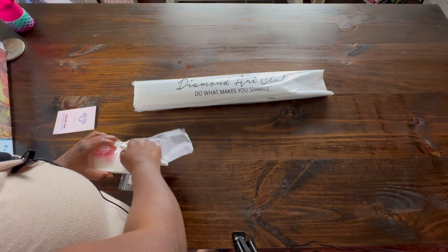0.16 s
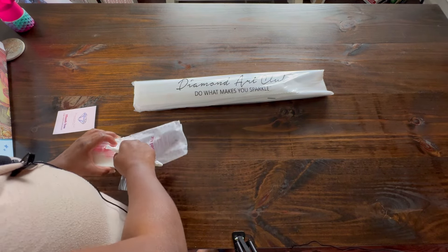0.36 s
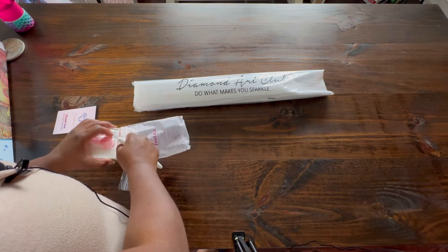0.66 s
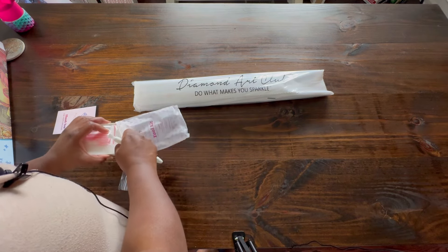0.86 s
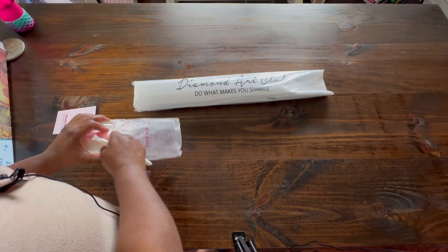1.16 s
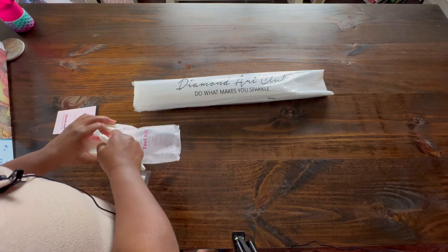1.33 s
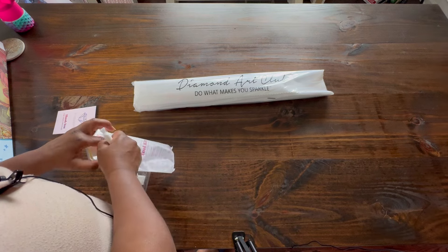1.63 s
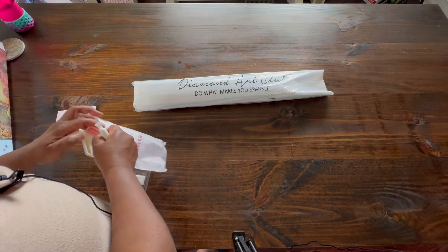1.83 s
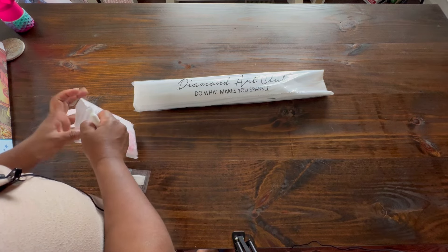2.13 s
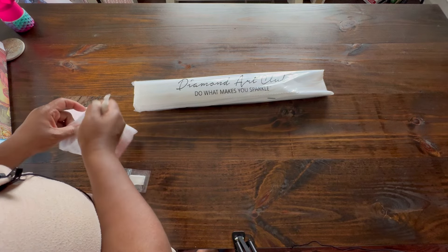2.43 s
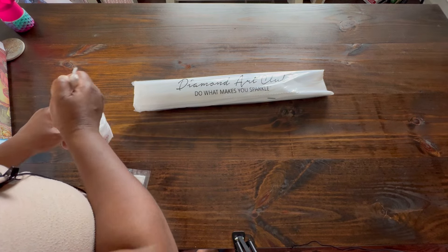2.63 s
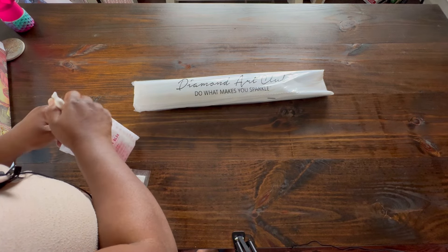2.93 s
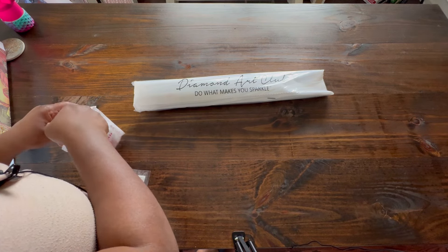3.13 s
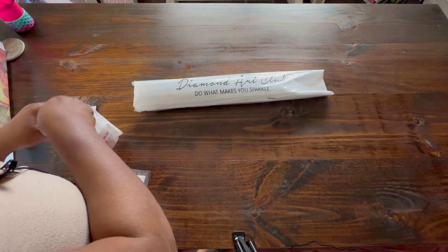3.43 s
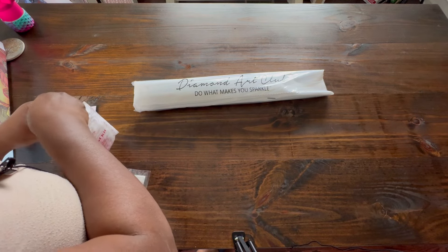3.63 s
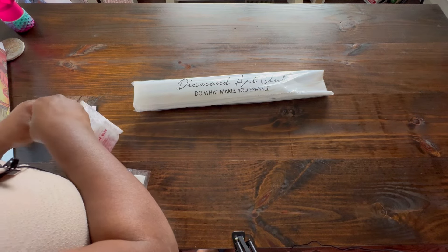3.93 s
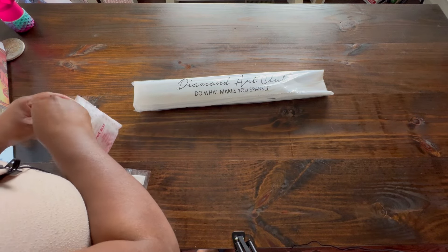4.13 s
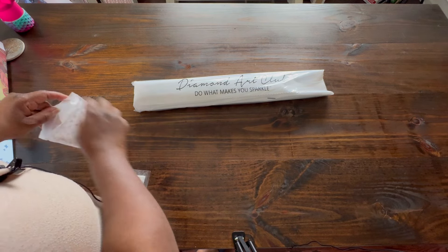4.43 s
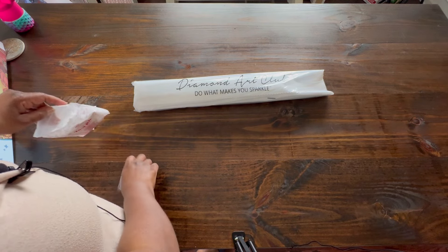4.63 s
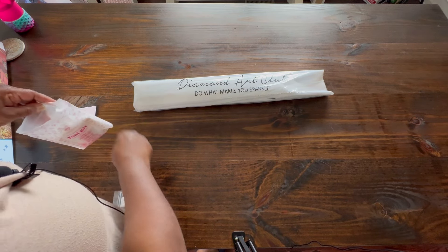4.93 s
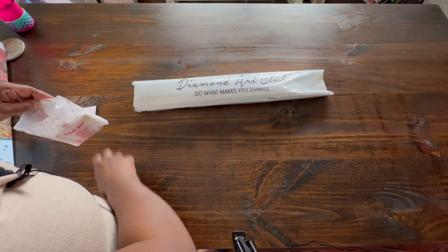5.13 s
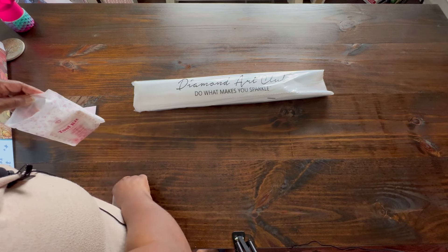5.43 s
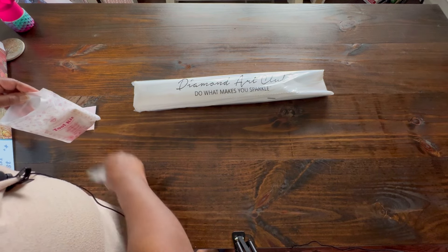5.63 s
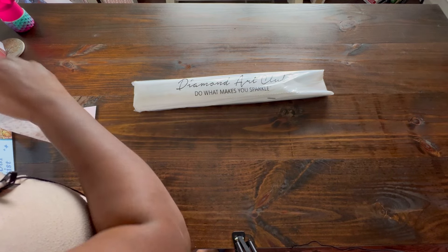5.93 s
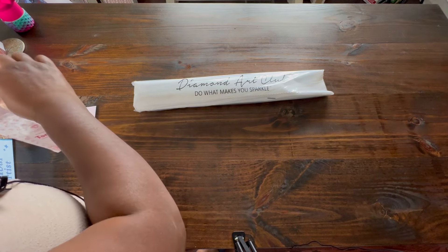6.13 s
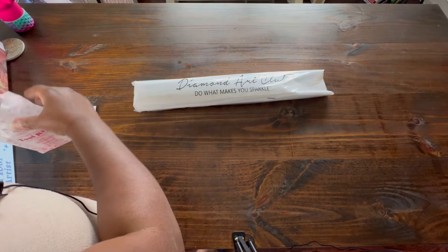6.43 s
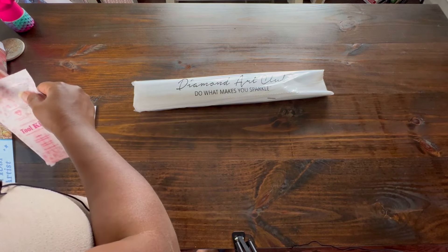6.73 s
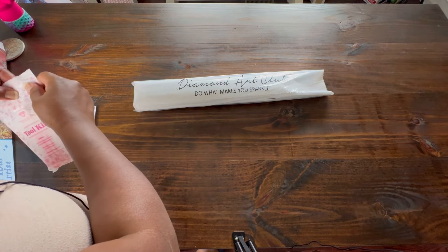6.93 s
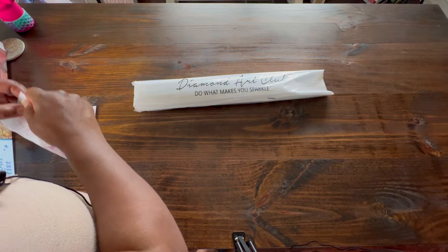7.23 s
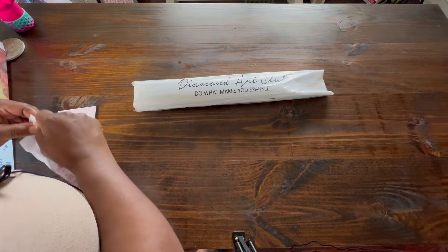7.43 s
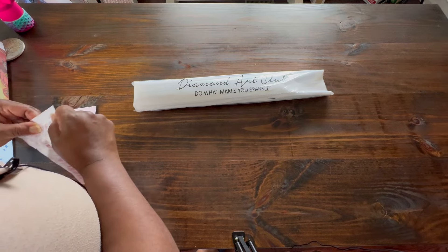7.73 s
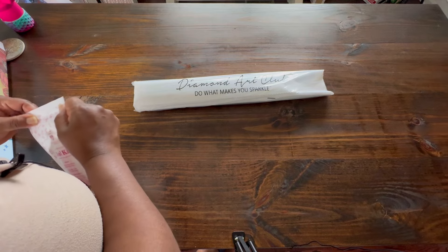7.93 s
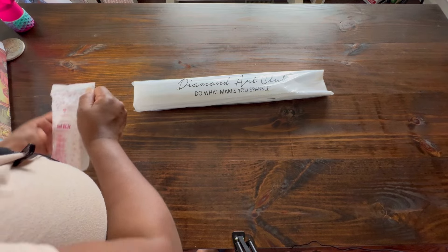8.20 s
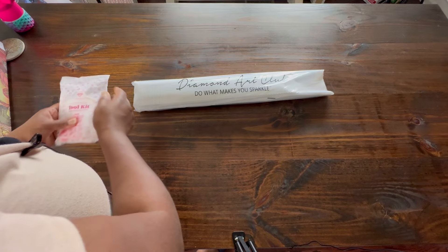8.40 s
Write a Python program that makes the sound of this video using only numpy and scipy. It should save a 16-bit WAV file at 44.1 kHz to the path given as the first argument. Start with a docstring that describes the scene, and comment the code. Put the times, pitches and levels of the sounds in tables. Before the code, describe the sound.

Two hands work a small stiff plastic packet over a wooden table. Dense crackles and snaps come first, swelling to a loud hollow crumple near two seconds, then sparse bursts, a very sharp snap with table knocks before five seconds, and lighter rustling to the end. Stereo microphones, brighter on the left, catch a lively quiet room with faint air noise and hum.

```python
"""A small stiff plastic packet crackles and snaps as two hands work it open over a wooden table.
Each grip swells and lets go: noise-like swarms of tiny creases feed filters for crackle, sizzle, finger rub
and the hollow ring of the pouch, while single buckles excite the same resonances as loud snaps.
Hands knock on the table, a sum of decaying modes; all of it echoes in a quiet, lively room.
Air noise and a low wavering hum lie underneath."""
import sys
import numpy as np
from scipy import signal
from scipy.fft import rfft, irfft, next_fast_len
from scipy.io import wavfile
from scipy.ndimage import uniform_filter1d

SR = 44100
rng = np.random.default_rng(int(sys.argv[2]) if len(sys.argv) > 2 else 0)


def unload_wav(signal):
    """Save mono or channel-first audio to the path in sys.argv[1] as 16-bit WAV at rate SR, clipped to [-1, 1]."""
    wavfile.write(
        sys.argv[1],
        SR,
        np.round(np.clip(np.atleast_2d(signal).T, -1, 1) * 32767).astype(np.int16),
    )


N = 377451
TIME = np.arange(N) / SR   # seconds

# Spectra of the creasing film and the rubbing fingers, the first two shared with the snaps.
# Each row: frequency in Hz, relative density in dB per Hz.
CRACKLE_SPECTRUM = [(900, -26.5), (1700, 9.5), (2500, 10), (3100, 6), (3800, 5), (5000, 4), (6800, 4.5),
                    (8500, -23), (12000, -29.5)]
SIZZLE_SPECTRUM = [(4500, -40.5), (7000, 4), (8200, 4), (9300, 8), (10300, 1.5), (11500, -2), (12600, -8),
                   (13600, 1), (14600, 6), (15400, -20.5), (16500, -5.5)]
RUB_SPECTRUM = [(90, -11), (180, -12), (300, 1), (450, -0.5), (800, 3), (1100, 6.5), (1500, -4.5),
                (2500, -23)]


def crinkling(typical_per_s=300, spread_db=3.5, clump_db=3.0, slide_share=0.41,
              crackle_trim_db=-1, sizzle_trim_db=-1, rub_trim_db=-1, ring_trim_db=0):
    """Crackling noise: the harder the film is worked, the more creases a second, in clumps as fingers slip."""
    crackle_db, sizzle_db, rub_db, ring_db = grip_levels()
    per_s = typical_per_s * from_db(0.6 * (crackle_db - np.median(crackle_db)))
    film = evened(creases(per_s, spread_db, facet_width_hz=600))
    film = film + slide_share * rng.standard_normal(N)   # between buckles the film slides on itself
    friction = film + 0.9 * rng.standard_normal(N)
    clumps_db = clump_db * drift(80)

    crackle = evened(coloured(film, CRACKLE_SPECTRUM))
    sizzle = evened(coloured(film, SIZZLE_SPECTRUM))
    rub = evened(coloured(friction, RUB_SPECTRUM))
    ring = evened(pouch(friction, pouch_hz(TIME)))
    return (from_db(crackle_db + clumps_db + crackle_trim_db) * crackle
            + from_db(sizzle_db + clumps_db + sizzle_trim_db) * sizzle
            + from_db(rub_db + rub_trim_db) * rub
            + from_db(ring_db + ring_trim_db) * ring)


# Each grip, pull or rub of the fingers. Each row: time of its height in seconds, swell in seconds,
# release in seconds, then crackle, sizzle, finger rub and hollow pouch ring in dB, before the trims.
GRIPS = [(0.0, .02, 0.058, -48.5, -61, -47.5, -49), (0.12, 0.11, 0.24, -47, -54, -49.5, -72),
         (0.3, .15, 0.1, -46.5, -47.5, -48, -64), (0.45, .1, 0.2, -51.5, -51.5, -57, -72),
         (0.64, 0.26, 0.075, -57.5, -61.5, -55, -70), (0.98, 0.114, 0.16, -52.5, -54, -47.5, -72),
         (1.17, 0.17, 0.11, -51, -52, -43, -67), (1.4, 0.156, 0.31, -54, -68, -48.5, -58),
         (1.54, 0.25, 0.38, -49.5, -50.5, -55, -59), (1.769, .1, 0.013, -48.5, -51.5, -59, -48.5),
         (1.951, 0.13, 0.14, -36.5, -42.5, -38, -41), (2.1, 0.1, 0.015, -41, -55, -42.5, -40),
         (2.199, 0.042, 0.094, -38, -43, -39.5, -38.5), (2.36, 0.357, .11, -46.5, -52.5, -51, -46.5),
         (2.49, 0.06, .04, -54.5, -56, -60, -43), (2.78, .15, 0.099, -57.5, -72, -58, -63),
         (2.98, 0.036, 0.29, -64.5, -66.5, -68, -85), (3.119, 0.031, 0.038, -38, -48, -41, -29.5),
         (3.53, 0.16, 0.033, -57.5, -67, -57, -60), (3.62, 0.038, 0.07, -52, -47.5, -44, -45.5),
         (3.68, 0.058, 0.15, -54, -64, -49, -47), (4.018, 0.019, .06, -55, -81, -47.5, -44.5),
         (4.22, .16, 0.043, -44.5, -47, -52, -55), (4.3, 0.053, 0.14, -48.5, -58, -48.5, -50.5),
         (4.46, .11, .03, -50, -60, -56, -52.5), (4.578, 0.064, 0.042, -46, -54, -39.5, -46),
         (4.69, 0.031, 0.15, -45.5, -45, -49, -65), (4.885, 0.051, 0.063, -54, -66, -45, -44.5),
         (5.33, 0.15, 0.24, -57, -63.5, -58.5, -64), (5.5, 0.022, .04, -41.5, -44, -46.5, -47),
         (5.609, 0.092, 0.078, -49.5, -49, -57, -74), (5.93, 0.1, 0.022, -69.5, -61, -75, -71),
         (6.08, 0.005, .04, -61, -57, -58, -65), (6.098, 0.017, 0.063, -43, -45, -47.5, -58),
         (6.16, .06, 0.18, -57, -58, -62, -51), (6.278, 0.044, 0.066, -46, -45, -58, -70),
         (6.5, 0.054, 0.36, -48.5, -50.5, -50.5, -69), (6.761, .07, .09, -46.5, -50.5, -53, -64),
         (7.08, 0.24, 0.12, -52.5, -56, -53, -76), (7.33, 0.037, 0.46, -56, -64, -54.5, -61),
         (7.598, 0.16, 0.034, -49, -51.5, -43, -74), (7.75, 0.32, 0.14, -52, -52.5, -53, -74),
         (8.08, 0.16, 0.034, -53.5, -53.5, -52.5, -72), (8.223, 0.0089, 0.19, -47.5, -52.5, -42.5, -69),
         (8.281, 0.075, 0.062, -44, -58, -49, -57)]
# The packet merely held. One row: crackle, sizzle, finger rub and hollow pouch ring in dB, before the trims.
HOLDING = (-75, -119, -70, -76)
GRIP_FADE_DB = 21.5   # a grip gains this much during its swell and loses it during its release


def grip_levels():
    """Power addition: exponential swells and releases of overlapping grips sum to levels in dB."""
    t = TIME[::32]
    height_s, swell_s, release_s, *levels = np.transpose(GRIPS)
    ago = t - height_s[:, None]
    fade = np.maximum(-ago / swell_s[:, None], ago / release_s[:, None])
    grip_power = from_db(-GRIP_FADE_DB * fade) ** 2
    result = []
    for db, held_db in zip(levels, HOLDING):
        power = from_db(db) ** 2 @ grip_power + from_db(held_db) ** 2
        result.append(np.interp(TIME, t, 10 * np.log10(power)))
    return result


def creases(per_s, spread_db, facet_width_hz, turn_db=-1.0):
    """Random impulses: buckles of very uneven size each ring a facet that turns to the microphones and away."""
    sizes = from_db(spread_db * np.minimum(rng.exponential(1, N), 4)) * rng.choice([-1, 1], N)
    clicks = sizes * (rng.random(N) < per_s / SR)
    facets_hz = np.linspace(2200, 15200, 14)
    dealt = rng.integers(0, len(facets_hz), N)   # the facet each click falls on
    film = 1.9 * clicks
    for k, hz in enumerate(facets_hz):
        film = film + from_db(turn_db * drift(42)) * resonance(clicks * (dealt == k), hz, facet_width_hz)
    return film


# Loud single buckles of the film. Each row: start in seconds, crack in dB over 1 ms, sizzle in dB above
# the crack, low pop in dB and pouch ring in dB (both before the trims), sound sent into the room in dB
# above the direct sound, facet pitch in Hz.
SNAPS = [(0.112, -31.5, 2, -34, -30, -2.5, 2360), (0.211, -29.5, -4, -50, -35, -1, 3330),
         (0.2696, -30, 1, -30, -27.5, 1.5, 4230), (0.3175, -30.5, -4, -45, -53, 3.5, 3960),
         (0.34, -35, -10, -51, -47, -8, 4200), (0.3913, -31.5, -2, -39, -42, -3.5, 3730),
         (0.4344, -25.5, -2.5, -27, -53, -5.5, 4380), (0.5013, -29.5, -4, -51, -59, -4, 5440),
         (0.6543, -44, 8.5, -48, -48, -6, 6650), (0.6847, -44, -6, -53, -50, 0, 3650),
         (0.7218, -45, -12, -60, -60, -8, 3930), (0.8652, -45, -22, -36, -41, 5, 2190),
         (0.8847, -40.5, -5, -37, -58, 2, 3400), (0.8989, -36, -23, -49, -49, 1.5, 5240),
         (0.951, -30, -17, -32.5, -50, 1.5, 9450), (0.9574, -29, -10, -27, -48, -9, 5000),
         (0.9684, -32, -13, -38, -49, 2.5, 4130), (0.983, -35, -9, -50, -45, -7, 8540),
         (0.9927, -24, -6, -30, -45, -2.5, 8600), (1.1005, -33, -11, -32.5, -41, 4, 2170),
         (1.1448, -30.5, -7, -27.5, -31, 1.5, 2170), (1.163, -31.5, -0.5, -42, -34, 7.5, 4140),
         (1.181, -26, -1, -32, -42, 2, 4160), (1.1973, -29, 0, -42, -39, 2.5, 6440),
         (1.2147, -33.5, 4, -39, -37, -0.5, 4300), (1.352, -37.5, -10, -49, -50, -6, 2480),
         (1.3934, -36, -7, -31, -29.5, 3, 2780), (1.4219, -26.5, -12, -24, -47, -2.5, 2740),
         (1.4519, -26.5, -7, -30.5, -43, 2.5, 2270), (1.4627, -31.5, -1, -27.5, -29, -1.5, 2190),
         (1.547, -29, -19, -45, -29, -13.5, 8760), (1.596, -33.5, -19, -55, -54, -9, 6300),
         (1.766, -45, -12, -37.5, -26.5, -0.5, 2300), (1.8382, -31, 2, -45, -34, 1, 7940),
         (1.932, -27.5, -4, -24, -16.5, -1, 9800), (1.9403, -25, 2, -35, -20.5, -4, 2190),
         (1.9835, -23, -3.5, -24.5, -16.5, -4, 2220), (2.0082, -23, -5, -46, -17.5, -4, 2186),
         (2.17, -33.5, 3, -33.5, -40, 4.5, 6230), (2.2007, -26, -0.5, -26, -39, -17, 3500),
         (2.2747, -34, 1.5, -30, -23, -4.5, 2230), (2.3359, -36, 1, -25, -47, -1, 2200),
         (2.3006, -30, -6, -30, -26, 2.5, 2270), (2.4777, -29.5, -10.5, -32.5, -44, 3, 2470),
         (2.7618, -41, -22, -58, -50, -3, 6000), (3.0958, -20, -3.5, -28, -16, 2.5, 3520),
         (3.525, -46, -4, -50, -56, -16, 4000), (3.6062, -34, 0, -35, -31, 4, 2300),
         (3.62, -30, -1.5, -39, -50, 5.5, 2300), (3.6667, -29.5, -25, -42, -51, 5.5, 2400),
         (3.726, -35.5, -12, -19.5, -22, -10.5, 1500), (3.9408, -42.5, -10, -44, -42.5, 4.5, 2720),
         (4.051, -46, -10, -60, -57, 11.5, 3220), (4.1147, -38.5, -18, -39.5, -42, 6.5, 3160),
         (4.16, -30.5, -1.5, -33, -36, 3, 5070), (4.228, -31.5, -14, -45, -38, 4, 2780),
         (4.2994, -35, 2, -59, -46, -1, 3540), (4.4502, -33, -2, -57, -52, -1, 2730),
         (4.6816, -32.5, 12.5, -47, -52, -1, 9200), (4.6867, -26.5, -7, -47, -51, -2.5, 3740),
         (4.758, -24, -1, -37, -43, 5, 3680), (4.7732, -15.5, -4, -38, -46, -4.5, 3980),
         (4.8217, -36, 10, -33.5, -55, 3.5, 8400), (5.3055, -44, -21, -38.5, -56, -5, 9500),
         (5.3772, -41, -3, -49, -40, 3.5, 3440), (5.4116, -36.5, -2.5, -61, -47, 1.5, 2780),
         (5.5035, -31, 1, -34, -51, 2, 6550), (5.571, -27.5, -18, -37, -32, 2.5, 9260),
         (6.112, -33, -12, -34.5, -45, 0.5, 5980), (6.1615, -31.5, -22, -32, -30, 3.5, 3100),
         (6.2046, -34.5, -10, -36.5, -35, 7, 2570), (6.4175, -37.5, -15, -41, -46, 3, 5800),
         (6.4662, -36.5, -8, -36.5, -52, 8.5, 2660), (6.4875, -25.5, -5.5, -29, -35, 4.5, 2570),
         (6.5027, -26.5, -1.5, -44, -47, -5, 5270), (6.6224, -31.5, 1, -35.5, -37.5, 1.5, 9900),
         (6.6452, -37, -2, -42, -45, -7, 9700), (6.7641, -36, -4, -25.5, -37, 0, 5200),
         (6.8138, -36, -8, -28.5, -49, -9, 6160), (6.9622, -38, -21, -32.5, -42, 2, 5330),
         (7.0335, -41.5, -20, -31, -46, -3, 6450), (7.0874, -32, -25, -38.5, -57, 0.5, 5640),
         (7.3909, -32, -5.5, -30.5, -46, 3, 4900), (7.5026, -37.5, -8, -30, -29, -2, 2150),
         (7.728, -41, -8, -29, -47, -8, 5240), (7.7793, -56, -7, -26.5, -43, -4, 6300),
         (7.809, -39, -7, -34, -44, 0, 4800), (8.0699, -30.5, -17, -27, -47, -2.5, 2580),
         (8.282, -30.5, -10, -36, -35, -1, 2240), (8.3298, -48, 10, -31.5, -34, -3, 7070),
         (8.4846, -37.5, -8.5, -38, -54, -1.5, 2430)]
# Large facets ring low, small ones high. Each row: facet pitch in Hz, resonance width in Hz.
FACET_WIDTH = [(2300, 350), (3500, 310), (6000, 1200), (10000, 670)]
# A pop of the whole wall. Each row: frequency in Hz, relative density in dB per Hz.
WALL_SPECTRUM = [(120, -25), (300, 4), (550, 0), (850, -0.5), (1200, 5.5), (1800, -12.5), (3000, -44.5)]


def snapping(pop_hz=700, pop_width_hz=400, facet_db=0, crack_trim_db=0, pop_trim_db=-1, ring_trim_db=-1):
    """Snap-through buckling: each flip cracks on its facet, pops the wall, rings the pouch and is beamed."""
    direct, beamed = np.zeros(N), np.zeros(N)   # towards the microphones, into the room
    for s, crack_db, sizzle_db, pop_db, ring_db, room_db, facet_hz in SNAPS:
        flip = flip_force()
        facet = energy_one(resonance(flip, facet_hz, at_hz(FACET_WIDTH, facet_hz)))
        crack = energy_one(coloured(flip, CRACKLE_SPECTRUM)) + from_db(facet_db) * facet
        sizzle = coloured(flip, SIZZLE_SPECTRUM)
        wall_hz = pop_hz * np.exp(0.21 * rng.standard_normal())   # a taut wall pops higher than a slack one
        wall = coloured(0.068 * flip + resonance(flip, wall_hz, pop_width_hz), WALL_SPECTRUM)
        ring = pouch(flip, pouch_hz(s))
        snap = (from_db(crack_db + crack_trim_db) * energy_one(crack)
                + from_db(crack_db + sizzle_db + crack_trim_db) * energy_one(sizzle)
                + from_db(pop_db + pop_trim_db) * energy_one(wall)
                + from_db(ring_db + ring_trim_db) * energy_one(ring))
        snap = snap * np.sqrt(SR / 1000)   # from unit energy to rms 1 over 1 ms
        add(direct, s, snap)
        add(beamed, s, snap * from_db(room_db))
    return direct, beamed


def flip_force(buckle_s=0.00024, step_s=0.00123, next_step_db=-6.5, count=3):
    """Stepwise release of strain: a fold gives way in a few quick steps, each weaker than the one before."""
    t = TIME[:1024]
    starts = step_s * np.cumsum(np.r_[0, rng.uniform(.5, 1.5, count - 1)])
    ages = np.maximum(t - starts[:, None], 0)
    pulses = np.sqrt(ages) * np.exp(-ages / buckle_s)
    envelope = from_db(next_step_db * np.arange(count)) @ pulses
    return envelope * rng.standard_normal(len(t))


# Modes of the hollow. Each row: multiple of the mean pitch, width in Hz, relative level in dB;
# the skirt then widens and weakens the modes away from the pitch.
POUCH_MODES = [(.93, 91, 3), (1.0, 113, 3), (1.09, 141, 2), (1.22, 168, -4.5), (1.82, 258, -11.5)]


def pouch(x, pitch_hz, skirt_hz=750):
    """Cavity resonance: the hollow packet rings in a narrow cluster of modes that glide with its pitch."""
    turn = np.exp(2j * np.pi * np.cumsum(pitch_hz * np.ones(len(x))) / SR)
    riding = x / turn + 1e-18   # seen from the gliding pitch, each mode stands still
    modes = 0
    for k, (multiple, width_hz, db) in enumerate(POUCH_MODES):
        offset_hz = (multiple - 1) * np.mean(pitch_hz)
        pole = np.exp((-np.pi * width_hz + 2j * np.pi * offset_hz) / SR)
        mode = signal.lfilter([1 - abs(pole)], [1, -pole], riding)
        modes = modes + (-1) ** k * from_db(db) * mode   # neighbours have opposite sign
    r = np.exp(-np.pi * skirt_hz / SR)
    return np.real(turn * signal.lfilter([1 - r], [1, -r], modes))


# The hollow changes pitch as it is squeezed. Each row: time in seconds, pitch in Hz.
SQUEEZE = [(.3, 1330), (1.1, 1220), (1.5, 1220), (1.8, 1325), (1.95, 1350), (2.05, 1470), (2.3, 1460),
           (3.1, 1340), (3.7, 1413), (4.05, 1284), (4.9, 1307), (5.55, 1444), (6.2, 1290), (6.6, 1276),
           (7.5, 1100), (8.2, 1225)]


def pouch_hz(s):
    """Cavity tuning: squeezing moves the pitch of the hollow, read here at a time."""
    return np.interp(s, *np.transpose(SQUEEZE))


# Hands and arms meeting the table. Each row: start in seconds, push in dB, contact time in seconds.
KNOCKS = [(1.972, -47, 0.0017), (2.307, -32, 0.0038), (2.33, -45, 0.0019), (2.405, -55, 0.0028),
          (3.63, -46, 0.0022), (3.729, -43.5, 0.00058), (3.859, -36.5, 0.0057), (4.5704, -29, 0.00029),
          (4.58, -38, 0.0013), (4.602, -34, 0.0026), (5.211, -38.5, 0.0043), (5.303, -31, 0.01),
          (6.949, -57, 0.0056)]
# Modes of the table top. Each row: frequency in Hz, level in dB for a unit push, 60 dB decay in seconds.
TABLE_MODES = [(119, -16, 0.39), (166, -17, 0.055), (186, -6, 0.069), (264.6, -7.5, 0.2), (347, -13, 0.068),
               (383, 6.5, 0.043), (434, -7, 0.075), (489, -7.5, 0.15), (585, -2.5, 0.057), (705, -5, 0.071),
               (894, -2, 0.041), (1100, -21, 0.049)]


def table_knocks(lowest_hz=105):
    """Modal excitation: a long soft contact reaches only the low modes; deep bass is not radiated."""
    force, t = np.zeros(N), TIME[:SR // 2]
    for s, db, contact_s in KNOCKS:
        push = t * np.exp(-4 * t / contact_s)
        add(force, s, from_db(db) * push / push.sum())
    wood = sum(from_db(db - 60 * t / t60) * np.sin(2 * np.pi * hz * t) for hz, db, t60 in TABLE_MODES)
    ringing = signal.fftconvolve(force, wood)[:N]
    return signal.sosfilt(signal.butter(2, lowest_hz, "high", fs=SR, output="sos"), ringing)


def room(x, count=5):
    """Directivity: the film keeps turning, so from moment to moment its sound takes other paths in the room."""
    facing = rng.integers(0, count, N // 512 + 1)[np.arange(N) // 512]
    echo = 0
    for k in range(count):
        facing_part = (x * (facing == k))[None]
        echo = echo + signal.oaconvolve(facing_part, reflections(), axes=1)[:, :N]
    return echo


# Decay of the room. Each row: frequency in Hz, 60 dB decay in seconds.
ROOM_T60 = [(100, 0.43), (500, 0.66), (1350, 0.56), (2200, 0.5), (3500, 0.53), (9000, 0.46), (15000, 0.14)]
# Likeness of the left and right echoes. Each row: frequency in Hz, correlation.
LIKENESS = [(100, 0.72), (300, 0.75), (700, 0.028), (2000, 0.054), (5000, 0.023), (8000, 0.37),
            (10000, 0.13), (16000, 0.22)]
# Colour of the reflections. Each row: frequency in Hz, level in dB.
ROOM_COLOUR = [(100, 3), (400, -1), (1400, 1.5), (4000, 1.5), (9000, -1), (12500, -2.5), (16000, -5)]


def reflections(first_echo_s=.006, early_db=2, early_s=0.025):
    """Reverberant decay: dense reflections follow a short gap, each band dying at its own rate."""
    t = TIME[:SR]
    edges = np.geomspace(50, 19000, 18)
    white, tail = rng.standard_normal((2, 2, len(t))), 0
    for k, (low, high) in enumerate(zip(edges, edges[1:])):
        band = signal.butter(2, [low, high], "band", fs=SR, output="sos")
        mid, side = signal.sosfilt(band, white[k % 2])   # neighbouring bands use different noise
        hz = np.sqrt(low * high)
        alike = np.clip(at_hz(LIKENESS, hz), -.99, .99)
        decay_db = -60 * t / at_hz(ROOM_T60, hz) + early_db * np.exp(-t / early_s)
        decay = from_db(decay_db) * (t > first_echo_s)
        mid = np.sqrt(1 + alike) * energy_one(mid * decay)
        side = np.sqrt(1 - alike) * energy_one(side * decay)
        pair = mid + side * np.array([[1], [-1]])
        tail = tail + pair * from_db(at_hz(ROOM_COLOUR, hz)) * np.sqrt((high - low) / SR)
    return tail


# Steady air noise. Each row: frequency in Hz, relative density in dB per Hz.
AIR_SPECTRUM = [(20, -3), (45, -4), (60, 0), (85, -7.5), (130, -1.5), (240, -4), (330, -5), (900, -9.5),
                (2000, -17), (3200, -42), (5000, -42), (9000, -30), (16000, -47)]
AIR_DB = -59   # rms of the part common to both microphones
# Lines of the hum. Each row: frequency in Hz, level in dB above the hum level.
HUM_LINES = [(59.2, 0.5), (118.4, -9.5), (193.8, -19)]
# The hum wavers. Each row: time in seconds, hum level in dB rms.
HUM_LEVEL = [(0.0, -68.5), (1.22, -63), (1.43, -72), (1.93, -61.5), (5.34, -60.5), (5.39, -68.5),
             (6.56, -60), (6.72, -66), (6.98, -52), (7.18, -75), (7.29, -62), (8.56, -60.5)]


def background(waver_db=0.6, apart=0.69):
    """Partial coherence: air noise partly shared by both microphones, over a hum of wavering sines."""
    shared, left, right = [rms_one(coloured(rng.standard_normal(N), AIR_SPECTRUM)) for _ in range(3)]
    air = from_db(AIR_DB) * (shared + apart * np.array([left, right]))
    level_db = np.interp(TIME, *np.transpose(HUM_LEVEL))
    hum = 0
    for hz, db in HUM_LINES:
        gain = from_db(level_db + db + waver_db * drift(9.9))
        hum = hum + gain * np.sin(2 * np.pi * hz * TIME + 0.2 * drift(5.4))
    return air + np.sqrt(2) * hum   # a sine of rms 1 peaks at sqrt(2)


def from_db(db):
    """Logarithmic level: decibels to amplitude gain."""
    return 10 ** (np.asarray(db) / 20)


def rms_one(x):
    """Mean power: scale to rms 1."""
    return x / np.sqrt(np.mean(x ** 2) + 1e-20)


def energy_one(x):
    """Signal energy: scale to a total of 1."""
    return x / np.sqrt(np.sum(x ** 2) + 1e-20)


def at_hz(points, hz):
    """Logarithmic pitch: read a table on a log-frequency axis."""
    f, value = np.transpose(points)
    return np.interp(np.log(np.maximum(hz, 1)), np.log(f), value)


def coloured(x, spectrum):
    """Minimum phase: the causal filter with the given spectrum, made by folding its cepstrum."""
    size = 2048
    gain = from_db(at_hz(spectrum, np.linspace(0, SR / 2, size // 2 + 1)))
    cepstrum = irfft(np.log(gain))
    cepstrum[1:size // 2] *= 2
    cepstrum[size // 2 + 1:] = 0
    return signal.fftconvolve(x, irfft(np.exp(rfft(cepstrum))))[:len(x)]


def resonance(x, hz, width_hz):
    """Damped oscillator: a two-pole resonance with gain 1 on top."""
    r = np.exp(-np.pi * width_hz / SR)
    zeros = np.array([1, 0, -1]) * (1 - r * r) / 2
    poles = [1, -2 * r * np.cos(2 * np.pi * hz / SR), r * r]
    return signal.lfilter(zeros, poles, x + 1e-18)


def drift(rate):
    """Slow random modulation: straight lines between chance values, rate of them a second, with rms 1."""
    knots = rng.standard_normal(N // 20)
    return rms_one(np.interp(TIME * rate, np.arange(len(knots)), knots))


def evened(x):
    """Short-time power: hold it near 1 over 30 ms, keeping the single grains."""
    power = np.maximum(uniform_filter1d(x ** 2, size=1323), 0)
    return x / np.sqrt(power + 0.09 * np.mean(x ** 2))


def add(track, s, sound):
    """Superposition: mix a sound into a track at a time."""
    start = int(np.clip(round(s * SR), 0, N - 1))
    track[start:start + len(sound)] += sound[:N - start]


def scene(crinkle_room_db=3, snap_room_db=0, table_room_db=-1):
    """Superposition of direct and reverberant sound: packet and table, over the background."""
    crinkle, knocks = crinkling(), table_knocks()
    snaps, beamed = snapping()
    packet_echo = room(from_db(crinkle_room_db) * crinkle + from_db(snap_room_db) * beamed)
    table_echo = room(from_db(table_room_db) * knocks, count=1)
    return crinkle + snaps + knocks + packet_echo + table_echo + background()


# The two microphones in level. Each row: frequency in Hz, left minus right in dB.
LEAN = [(60, 1.5), (150, 2.5), (600, 5.5), (2000, 4), (3500, 6), (5500, 8.5), (7200, 8.5), (8600, -0.5),
        (16000, 0)]
# The two microphones in phase. Each row: frequency in Hz, lead of the left one in radians.
PORT_PHASE = [(0, -0.9), (300, 1), (780, 2.5), (2000, 3.5), (3800, 6.5), (6400, 8.5), (8400, 12.5),
              (10900, 7), (13000, 1.5), (16000, -5)]
CUTOFF_HZ = 16300


def record(dry, bass_cut_hz=44):
    """Interchannel level and phase differences at two microphones; the deepest bass and the top are cut."""
    size = next_fast_len(N + SR // 2)
    hz = np.arange(size // 2 + 1) * SR / size
    lean = from_db(at_hz(LEAN, hz))
    lag = np.exp(-1j * np.interp(hz, *np.transpose(PORT_PHASE)))
    ports = np.array([lean, lag]) * np.sqrt(2 / (1 + lean ** 2))   # the summed power gain stays at 2
    heard = irfft(rfft(dry, size) * ports, size)[:, :N]
    heard = signal.sosfilt(signal.butter(4, bass_cut_hz, "high", fs=SR, output="sos"), heard)
    return signal.sosfilt(signal.ellip(10, .2, 80, CUTOFF_HZ, fs=SR, output="sos"), heard)


dry = scene()
out = record(dry)
unload_wav(out)
```